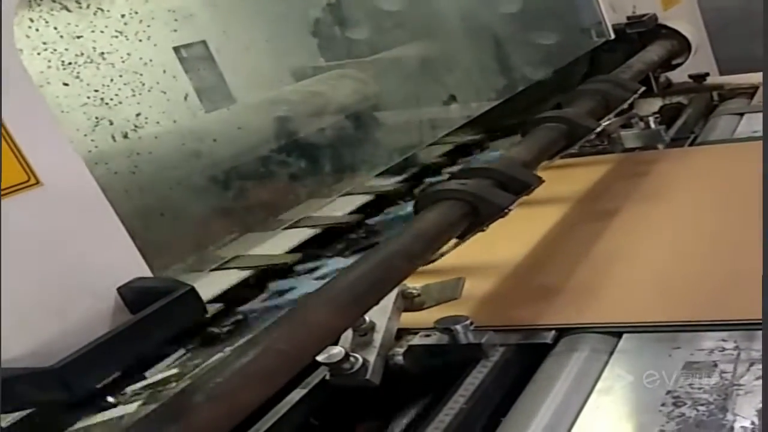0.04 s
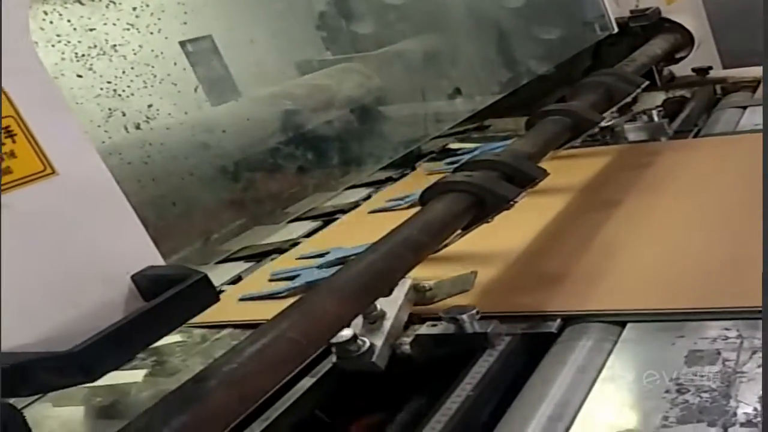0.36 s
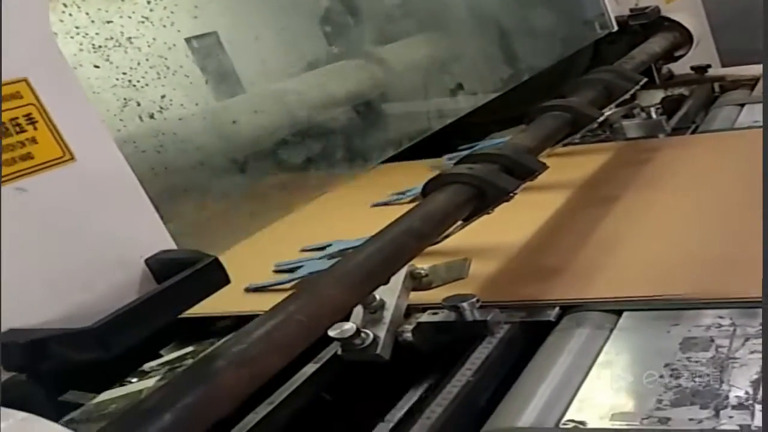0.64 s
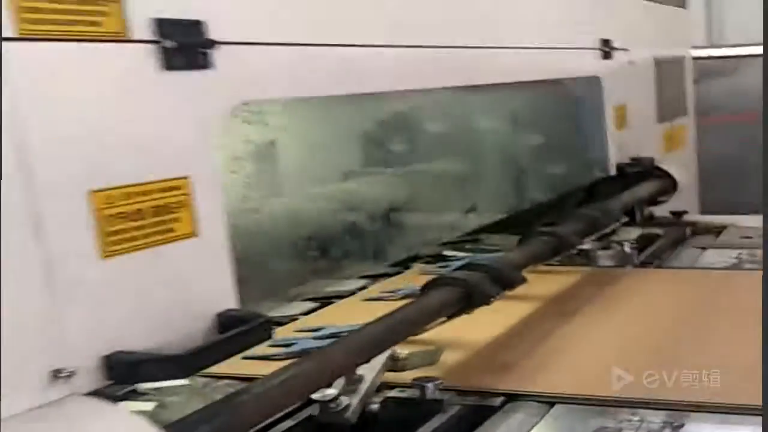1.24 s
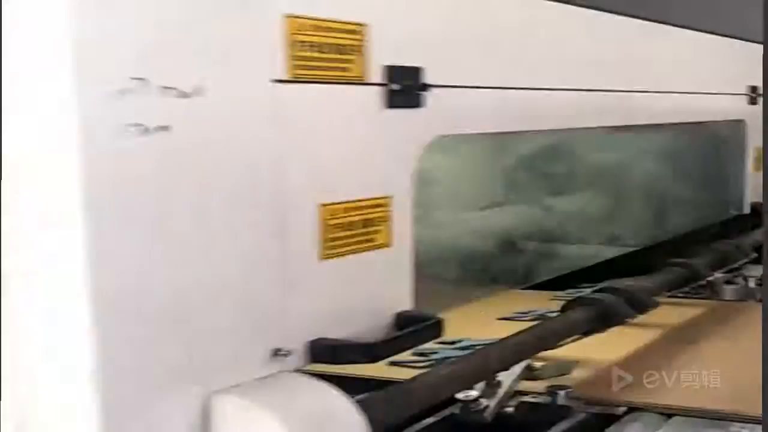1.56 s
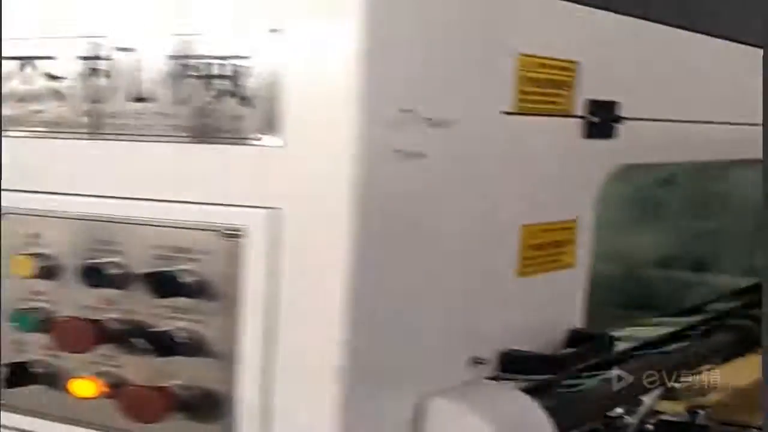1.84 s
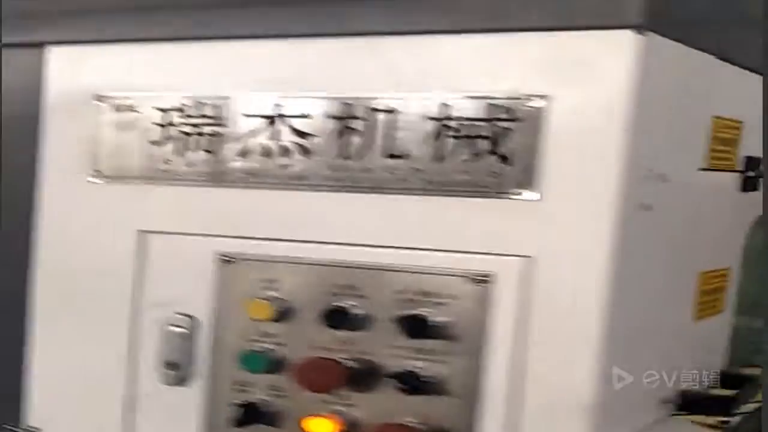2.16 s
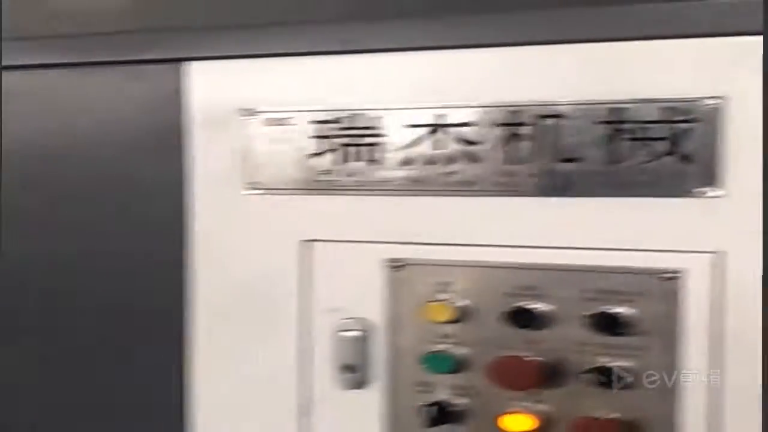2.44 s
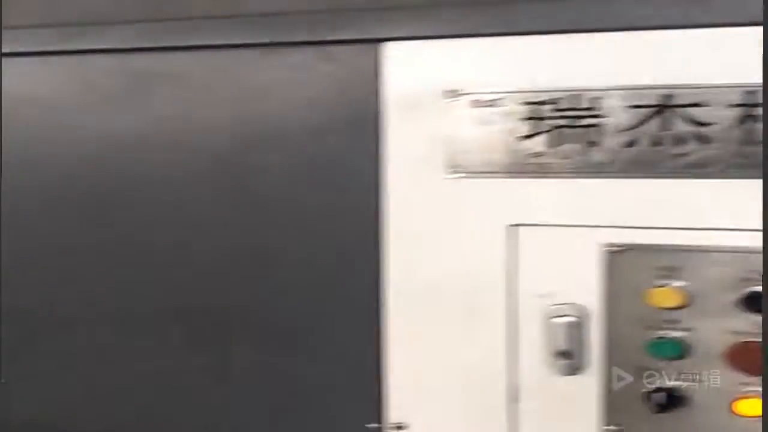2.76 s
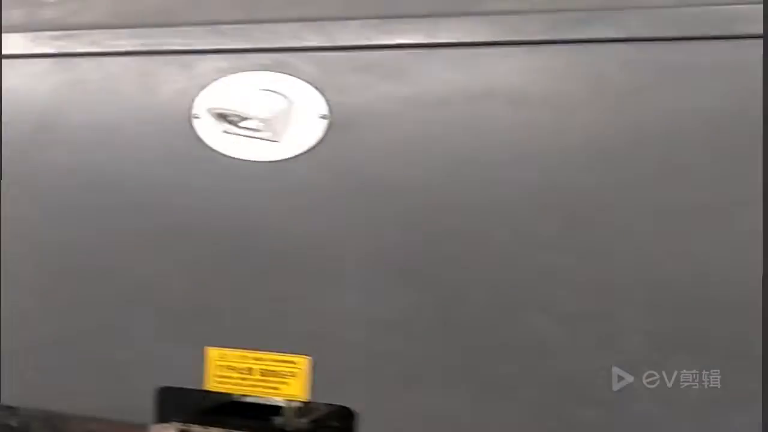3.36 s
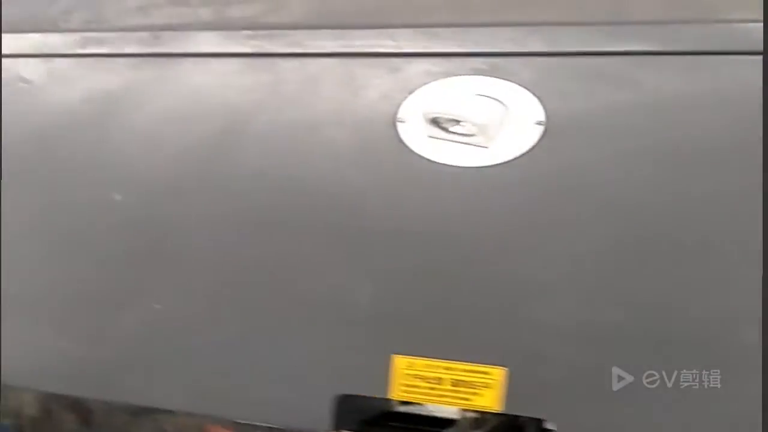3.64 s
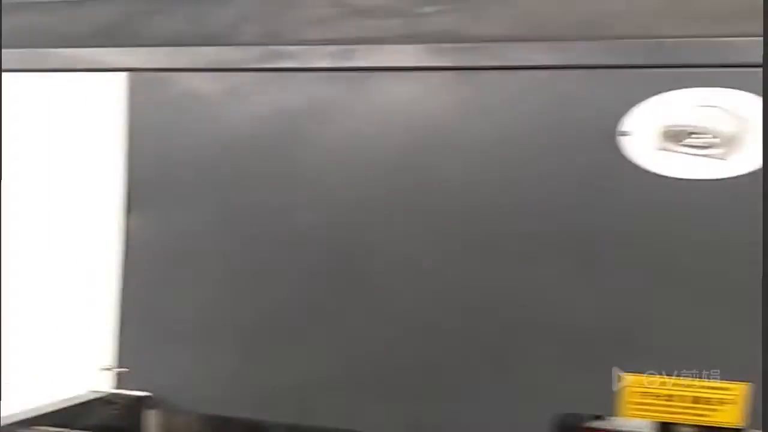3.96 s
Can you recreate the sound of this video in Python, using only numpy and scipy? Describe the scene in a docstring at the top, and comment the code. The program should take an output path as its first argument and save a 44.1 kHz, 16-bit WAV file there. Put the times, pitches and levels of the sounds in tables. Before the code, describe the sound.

In a rumbling factory hall, a nearby carton machine cycles steadily: air rushes, a cardboard sheet scrapes through rollers, knocks and flops down, and the feeder clacks back. The hiss softens as the microphone passes behind a cabinet.

```python
"""A carton machine draws in one cardboard sheet per cycle in a factory hall. Each feed opens with a thump and a
rush of suction air. The sheet rubs through the rollers, knocks on the stops, snaps free and the board flexes
with a thud; the feeder clacks back. Frame and panels ring along. Drives rumble throughout. The listener walks
behind the control cabinet, which shades the treble."""
import sys
import numpy as np
from scipy import signal
from scipy.fft import rfft, irfft
from scipy.io import wavfile

SR = 44100
rng = np.random.default_rng(int(sys.argv[2]) if len(sys.argv) > 2 else 0)


def put_to_file(sound):
    """Save the sound as 16-bit audio at rate SR, in the file named by the first command-line argument."""
    columns = np.atleast_2d(sound).T  # one column per channel
    safe = np.clip(columns, -1, 1)
    whole_steps = np.round(safe * 32767)
    wavfile.write(sys.argv[1], SR, whole_steps.astype(np.int16))


N = 176400
T = np.arange(N) / SR
HZ = np.maximum(np.fft.rfftfreq(N, 1 / SR), 1)

# layer levels per feed: suction_db, rub_db, hiss_db, roller_db, shudder_db, drone_db
FEEDS = [(-1, 1.5, 0, 4, -34, -9), (2.5, 2.5, 10.5, 3, -3, -17), (0, 0, 4.5, -1.5, -2, -5.5),
         (-4, 0, 0, -0.5, -1, -3.5), (-4.5, 0, -9, 1.5, 6.5, 0.5)]
SUCTION_DB, RUB_DB, HISS_DB, ROLLER_DB, SHUDDER_DB, DRONE_DB = np.transpose(FEEDS)
FIRST_FEED_S, CYCLE_S = -.158, .937
# sheet rubbing on rollers and bed: after_start_s, level_db
RUB_SHAPE = [(-.006, -43.5), (.025, -27.5), (.13, -22.5), (.24, -22), (.3, -18.5), (.35, -25.5),
             (.4, -21.5), (.48, -29.5), (.56, -36), (.75, -48.5), (.94, -40.5)]
# rub spectrum: freq_hz, level_db
RUB_COLOUR = [(150, -9), (350, -12), (560, 0), (1000, 2.5), (1500, -2), (1950, 1.5), (2400, -2.5),
              (3100, -3.5), (5500, -3), (7500, -34), (16000, -42)]
# spectrum of snapping board and air: freq_hz, level_db
SNAP_COLOUR = [(400, 2), (1000, 0), (2300, -4.5), (3100, 9.5), (3600, 3.5), (4200, 6.5), (5800, 13),
               (6600, -1.5), (7800, -34), (16000, -25)]
# steel frame and guards: freq_hz, gain_db, t60_s
FRAME_MODES = [(580, -10, 0.64), (797, 8, 0.2), (910, 3, 0.18), (1112, -22, 0.058), (1980, 3, 0.21),
               (2173, 15.5, 0.083), (2880, -1, 0.065), (3000, 1, 0.2), (3330, 3, 0.25), (4445, 5, 0.25),
               (4900, 15, 0.14), (5450, 15, 0.05), (5450, 6, 0.2), (5890, 9, 0.27), (6700, -14, .15)]
# how far the cabinet hides the feeder: time_s, share
SHADE = [(0, 0.2), (1.3, 0.5), (2.2, 0.28), (2.5, 0.44), (2.66, 0.8), (2.95, 0.88), (3.3, 0.59), (3.6, 1),
         (4, 0.88)]
HIDDEN = np.interp(T, *np.transpose(SHADE))
# left-right likeness: freq_hz, correlation
LIKENESS = [(30, 1), (125, 0.97), (250, 0.93), (500, 0.73), (1000, 0.41), (2000, 0.064), (5000, 0.004),
            (15000, 0.059)]


def from_db(db):
    """Decibels to gain."""
    return 10 ** (np.asarray(db) / 20)


def rms_one(x):
    """Scale to unit power."""
    return x / np.sqrt(np.mean(x ** 2) + 1e-20)


def at_hz(points):
    """Interpolate a spectrum on a log-frequency axis."""
    hz, value = np.transpose(points)
    return np.interp(np.log(HZ), np.log(hz), value)


def drift(corner_hz):
    """Low-passed random wander, unit power."""
    return rms_one(irfft(rfft(rng.standard_normal(N)) / (1 + (HZ / corner_hz) ** 2), N))


def noise(colour):
    """Coloured stereo noise, alike in the bass, diffuse in the treble."""
    mid, side = rfft(rng.standard_normal((2, N)))
    alike = np.clip(at_hz(LIKENESS), -1, 1)
    stereo = np.sqrt(1 + alike) * mid + np.sqrt(1 - alike) * side * [[1], [-1]]
    rolloff = np.minimum(1, np.minimum(colour[-1][0] / HZ, HZ / colour[0][0])) ** 3
    return rms_one(irfft(from_db(at_hz(colour)) * rolloff * stereo, N))


def shade(full_db):
    """Gain of a source as the cabinet comes between."""
    return from_db(full_db * HIDDEN)


def cycled(shape, levels_db):
    """Repeat one envelope at every feed."""
    after_s, db = np.transpose(shape)
    out = 0
    for feed, level_db in enumerate(levels_db):
        age = T - (FIRST_FEED_S + CYCLE_S * feed)
        active = (age > after_s[0]) * (age < after_s[-1])
        out = out + from_db(level_db + np.interp(age, after_s, db)) * active
    return out


def blow(start_s, rise_s, t60_s, tail_db=-17.5, tail_t60_s=.82):
    """Envelope: quick rise, decay, quieter hall tail."""
    age = np.maximum(T - start_s - rise_s, 0)
    decay = np.hypot(from_db(-60 * age / t60_s), from_db(tail_db - 60 * age / tail_t60_s))
    return np.clip((T - start_s) / rise_s, 0, 1) * decay


def swell(age, peak_s):
    """Envelope of a soft push, peak 1."""
    return (age / peak_s * np.exp(1 - age / peak_s)) ** 2


def ring(x, modes):
    """Damped modes, scaled to the power of their drive."""
    out = 0
    for hz, db, t60_s in modes:
        r, w = from_db(-60 / (t60_s * SR)), 2 * np.pi * hz / SR
        out = out + signal.lfilter([0, from_db(db) * np.sin(w)], [1, -2 * r * np.cos(w), r * r], x + 1e-18)
    return rms_one(out) * np.std(x)


def reverb(x, wet_db=-8, t60_s=.24, gap_s=.012):
    """Dense stereo tail of the hall, wet only."""
    t = T[:SR]
    tail = rng.standard_normal((3, SR)) * from_db(-60 * t / t60_s) * (t > gap_s)
    tail = tail[:2] * 0.3 + tail[2]
    tail /= np.sqrt(np.sum(tail[0] ** 2))
    return from_db(wet_db) * signal.fftconvolve(x.mean(axis=0)[None], tail, axes=1)[:, :N]


def panel_echoes(x, count=4, echo_db=-9, longest_s=.022):
    """Echoes off nearby steel panels ripple the treble, differently at each ear."""
    lags_s = longest_s * rng.uniform(.1, 1, (count, 2, 1))
    echoes = sum(np.exp(-2j * np.pi * HZ * lag) for lag in lags_s) / np.sqrt(count)
    gain = from_db(echo_db) * (1 - np.clip(at_hz(LIKENESS), 0, 1))
    return irfft(rfft(x) * (1 + gain * echoes) / np.sqrt(1 + gain ** 2), N)


def hall(rumble_db=-31.5, waver_db=2, throb_db=.5):
    """Hall rumble and drive tones that waver in level."""
    # drive tones: pitch_hz, level_db
    tones = [(37.7, -51), (113, -46), (300, -64)]
    # rumble spectrum: freq_hz, level_db
    colour = [(20, -29), (38, 2.5), (70, -2), (120, -5.5), (170, -1.5), (260, -1), (400, -11), (500, -12.5),
              (620, -11), (980, -18.5), (1250, -36), (3000, -17), (5500, -30), (7500, -32), (14000, -29),
              (16000, -63)]
    hum = 0
    for hz, db in tones:
        amplitude = np.sqrt(2) * from_db(db + waver_db * drift(7.9))
        hum = hum + amplitude * np.sin(2 * np.pi * (hz * T + rng.random()))
    return hum + noise(colour) * from_db(rumble_db + throb_db * drift(17)) * shade(-8.5)


def rollers():
    """Loaded rollers rumble with each feed."""
    # envelope: after_start_s, level_db
    shape = [(-.01, -46), (.03, -28.5), (.1, -26.5), (.2, -34.5), (.31, -35.5), (.4, -26), (.48, -28.5),
             (.58, -42), (.8, -41)]
    # spectrum: freq_hz, level_db
    colour = [(20, 15.5), (36, -11), (60, 3.5), (90, 5.5), (130, 6), (200, 4.5), (310, 2), (430, 0.5),
              (800, -7), (3000, -59)]
    return noise(colour) * cycled(shape, ROLLER_DB)


def shudder():
    """The frame shudders after each feed."""
    # envelope: after_start_s, level_db
    shape = [(-.01, -54), (.03, -36), (.15, -39), (.28, -41), (.5, -61)]
    # spectrum: freq_hz, level_db
    colour = [(15, -32), (28, 6), (37, 10), (50, 12), (70, 15), (120, -46)]
    return noise(colour) * cycled(shape, SHUDDER_DB)


def cabinet_drone():
    """Cabinet panels, heard from close by, drone with the sheet."""
    # panels: freq_hz, gain_db, t60_s
    modes = [(229, -4, 0.12), (319.3, 9, 0.21), (373, -7, 0.26), (558, -12.5, 0.066), (1005, -10.5, 0.042),
             (1244, -9, 0.054), (1533, -7, 0.074), (1750, -11, 0.045)]
    drive = noise(RUB_COLOUR) * cycled(RUB_SHAPE, RUB_DB + DRONE_DB) * HIDDEN
    return ring(drive, modes) * shade(-5)


def thumps(body_db=-10, skirt_db=-7):
    """Low pushes of the feeder: brief tones with rumble around their pitch."""
    # start_s, level_db, pitch_hz, peak_s
    pushes = [(0.277, -19.5, 119.5, 0.024), (0.779, -16, 50.5, 0.012), (.785, -19, 208, 0.0093),
              (.822, -16.5, 167, 0.013), (.855, -20, 72, 0.013), (1.204, -18, 122, 0.0051),
              (1.708, -19, 50, 0.017), (1.715, -21.5, 150, 0.01), (1.744, -21, 203, 0.013),
              (2.486, -25.5, 78, 0.015), (2.656, -22, 67.4, 0.0093), (2.709, -14.5, 143, 0.0053),
              (2.867, -19, 214, 0.011), (3.024, -16.5, 150, 0.0122), (3.055, -19, 200, 0.0071),
              (3.414, -19, 77, 0.016), (3.467, -23, 65, 0.012), (3.519, -20, 58, 0.013),
              (3.591, -20, 49.3, 0.007), (3.647, -27, 180, 0.01), (3.755, -20.5, 215, 0.013)]
    out = 0
    for start_s, db, hz, peak_s in pushes:
        age = np.maximum(T - start_s, 0)
        body = from_db(body_db) * noise([(hz / 2, skirt_db), (hz, 0), (hz * 2, skirt_db)])
        out = out + from_db(db) * swell(age, peak_s) * (np.sin(2 * np.pi * hz * age) + body)
    return out + reverb(out)


def clacks(rise_s=.0052, strike_t60_s=.045, linkage_db=-9.5):
    """Return stroke: a dull clack; the linkage rings when it lands hard."""
    # start_s, level_db, t60_s, hardness_db
    strokes = [(.615, -20.5, 0.37, 6.5), (1.526, -34, 0.45, -12), (1.559, -24, 0.17, -9),
               (2.483, -22.5, 0.48, 12), (3.412, -31, 0.58, -15)]
    # clack spectrum: freq_hz, level_db
    colour = [(150, -0.5), (330, 2.5), (480, 2), (700, -5.5), (950, 3), (1130, -6.5), (1350, -10.5),
              (3000, -16.5)]
    # linkage: freq_hz, gain_db, t60_s
    modes = [(973, 5, 0.1), (1130, 15, 0.08), (1855, 8, 0.22), (1970, 5, 0.16), (2900, -6, 0.12),
             (3070, -7, 0.13)]
    power, strike = 0, 0
    for start_s, db, t60_s, hardness_db in strokes:
        age = np.maximum(T - start_s, 0)
        power += (from_db(db) * blow(start_s, rise_s, t60_s, tail_db=-17, tail_t60_s=.4)) ** 2
        strike += from_db(db + hardness_db - 60 * age / strike_t60_s) * (T > start_s)
    linkage = rms_one(ring(strike * rng.standard_normal((2, N)), modes)) * np.sqrt(power.mean())
    return np.sqrt(power) * noise(colour) + from_db(linkage_db) * linkage


def flexes(body_db=-9, glide_hz_per_s=550, swish_t60_s=.59):
    """The board flexes: a hollow thud rising in pitch, a swish as it scrapes."""
    # start_s, level_db, pitch_hz, peak_s, swish_db
    bends = [(0.458, -18, 204, 0.0074, -3.5), (0.483, -16.5, 242.6, 0.013, -8.5),
             (1.391, -20.5, 203, 0.0076, -10), (1.42, -26.5, 249, 0.015, -18),
             (2.331, -17.5, 241, .008, -19), (3.266, -15, 219, 0.0082, -25),
             (3.291, -39, 239, .007, -25)]
    # thud spectrum: freq_hz, level_db
    colour = [(110, 2), (170, -4), (290, 2.5), (350, -20), (600, -19), (1200, -59)]
    body = from_db(body_db) * noise(colour)
    thud, swish = 0, 0
    for start_s, db, hz, peak_s, swish_db in bends:
        age = np.maximum(T - start_s, 0)
        tone = np.sin(2 * np.pi * (hz + glide_hz_per_s * age / 2) * age)
        thud = thud + from_db(db) * swell(age, peak_s) * (tone + body)
        swish = np.hypot(swish, from_db(db + swish_db) * blow(start_s, peak_s, swish_t60_s))
    return thud + reverb(thud) + swish * noise(SNAP_COLOUR)


def contacts(events, rise_s):
    """Envelope of the sheet's contacts, summed in power."""
    return np.sqrt(sum((from_db(db) * blow(start_s, rise_s, t60_s, tail_db=-6.5, tail_t60_s=.36)) ** 2
                       for start_s, db, t60_s in events))


def knocks(frame_db=-11.5):
    """The sheet knocks on the stops and sets the frame ringing."""
    # start_s, level_db, t60_s
    hits = [(0.241, -16, 0.27), (1.152, -19, 0.091), (1.175, -13, 0.13), (2.11, -19, 0.16),
            (2.185, -19.5, 0.16), (3.043, -23, 0.051), (3.985, -30, .15)]
    # spectrum: freq_hz, level_db
    colour = [(100, -24), (300, -3), (460, -5.5), (565, 9), (690, -0.5), (785, 10.5), (845, 9), (912, 10),
              (1010, -5), (1110, 6), (1300, -7), (2000, -29), (6000, -38)]
    knock = contacts(hits, rise_s=.011) * noise(colour)
    return knock + from_db(frame_db) * ring(knock, FRAME_MODES)


def snaps(rise_s=.0079):
    """Sharp cracks of board and air, each with its own share of sizzle."""
    # start_s, level_db, treble_db, t60_s
    cracks = [(.117, -28, 5, 0.055), (0.131, -15, 2, 0.043), (0.147, -15.5, -1, 0.43),
              (0.302, -12.5, -15, 0.17), (0.702, -22.5, -12, 0.13), (1.065, -17, 1, 0.48),
              (1.238, -8, -21, 0.096), (1.635, -34, -9, 0.11), (2.134, -14.5, 2, 0.21),
              (2.173, -11, -10, 0.19), (2.194, -13.5, 3.5, 0.13), (2.48, -13, -16, 0.036),
              (2.839, -19.5, -38, 0.07)]
    # sizzle spectrum: freq_hz, level_db
    sizzle_colour = [(2500, -41), (5000, -26), (6000, 7.5), (7500, 3), (9500, 1), (13000, 3.5), (15000, 0),
                     (16000, -24)]
    body, sizzle = 0, 0
    for start_s, db, treble_db, t60_s in cracks:
        envelope = from_db(db) * blow(start_s, rise_s, t60_s)
        body = np.hypot(body, envelope)
        sizzle = np.hypot(sizzle, envelope * from_db(treble_db))
    return body * noise(SNAP_COLOUR) + sizzle * noise(sizzle_colour)


def catches(grain_db=3, grain_hz=350):
    """The board catches in the rollers with short grainy rasps."""
    # start_s, level_db, t60_s
    rasps = [(0.131, -17, .12), (0.223, -17.5, 0.098), (.615, -25.5, .09), (.797, -23.5, .14),
             (1.16, -32, .06), (1.716, -21, 0.17), (1.845, -24, .05), (2.114, -27, .05),
             (2.912, -32, 0.017), (2.942, -22, 0.18), (3.05, -24.5, .07), (3.87, -21, .1)]
    # spectrum: freq_hz, level_db
    colour = [(500, -9), (1000, 8.5), (1520, 4), (1900, 3), (2400, 3), (2900, -6), (3600, 0), (6000, -10),
              (8000, -18), (15000, -32)]
    return contacts(rasps, rise_s=.0045) * rms_one(noise(colour) * from_db(grain_db * drift(grain_hz)))


def crackle(colour, per_s, spread_db):
    """Tiny slips of the board's fibres, random in time and size."""
    sizes = from_db(spread_db * np.minimum(rng.exponential(1, (2, N)), 4))
    signs = rng.choice([-1, 1], (2, N))
    slips = sizes * signs * (rng.random((2, N)) < per_s / SR)
    return rms_one(irfft(rfft(slips) * from_db(at_hz(colour)), N))


def slaps(per_s=70, spread_db=1.5):
    """The sliding sheet slaps the bed and rings, differently at each ear."""
    # board: freq_hz, level_db, t60_s
    modes = [(660, 2.5, 0.031), (910, 0, 0.027), (1372, -0.5, 0.033), (1909, 0.5, 0.02), (2288, 1.5, 0.035),
             (2850, 3.5, 0.016), (4420, 4, .012)]
    sizes = from_db(spread_db * np.minimum(rng.exponential(1, N), 2.5))
    hits = sizes * (rng.random(N) < per_s / SR)
    out = 0
    for hz, db, t60_s in modes:
        drive = hits * (rng.standard_normal((2, N)) + rng.standard_normal(N))
        out = out + from_db(db) * rms_one(ring(drive, [(hz, 0, t60_s)]))
    return rms_one(out)


def sheet_echo(x, first_delay_s=.0046, slope_s_per_s=-.001967, echo_db=-9):
    """The advancing sheet reflects its own rubbing; ripples glide through the spectrum."""
    delay_s = first_delay_s + slope_s_per_s * ((T - FIRST_FEED_S) % CYCLE_S)
    echo = np.array([np.interp(T - delay_s, T, ear) for ear in x])
    gain = from_db(echo_db)
    return (x + gain * echo) / np.hypot(1, gain)


def sheet_hiss(grit_db=-7):
    """Bright hiss and ticking fibres as the sheet gathers speed."""
    # envelope: after_start_s, level_db
    shape = [(0, -39), (.06, -42.5), (.135, -15), (.21, -14.5), (.25, -19.5), (.31, -14), (.37, -22.5),
             (.44, -31), (.52, -34), (.62, -27), (.8, -44.5), (.937, -43)]
    # spectrum: freq_hz, level_db
    colour = [(2000, -42), (5000, -1), (6800, 3), (8000, -4.5), (9500, -5), (11000, -3.5), (13000, 0),
              (15000, 0), (16000, -31)]
    grit = from_db(grit_db) * crackle(colour, per_s=1200, spread_db=1.5)
    return rms_one(noise(colour) + grit) * cycled(shape, HISS_DB) * shade(-36)


def sheet_rub(scrape_db=3.5, fibre_db=-27, slap_db=-4.5):
    """The sheet rubs, scrapes and slaps over rollers and bed."""
    # sharp edge of the rub: freq_hz, level_db
    scrape_colour = [(900, -3.5), (1400, -24), (2000, -4), (2400, 3.5), (2800, 5.5), (3300, 2), (3800, -7),
                     (5500, -25), (7500, -27)]
    scrape = from_db(scrape_db) * noise(scrape_colour)
    fibres = from_db(fibre_db) * crackle(SNAP_COLOUR, per_s=900, spread_db=3)
    clatter = from_db(slap_db) * slaps()
    friction = noise(RUB_COLOUR) * shade(-5) + (scrape + fibres) * shade(-25.5) + clatter * shade(-11.5)
    return sheet_echo(friction) * cycled(RUB_SHAPE, RUB_DB)


def suction(rise_s=.0034):
    """Air spits as the valve opens, then rushes through the cycle."""
    # rush envelope: after_start_s, level_db
    shape = [(-.004, -72), (.003, -25), (.02, -20.5), (.04, -13.5), (.09, -17.5), (.145, -12), (.195, -10),
             (.245, -15.5), (.31, -7.5), (.35, -17.5), (.385, -13.5), (.44, -25), (.56, -25), (.66, -25),
             (.79, -35.5), (.94, -38.5)]
    # air spectrum: freq_hz, level_db
    colour = [(1500, -6.5), (2400, -12), (2900, -11), (3250, -14), (3700, -8), (4250, 0), (5300, 3),
              (5900, 5), (6450, -5.5), (7200, -27.5), (9000, -55), (16000, -31)]
    # start_s, level_db, t60_s
    spits = [(0.782, -21, 0.074), (.812, -28, 0.17), (1.712, -13, 0.094), (1.753, -33, 0.18),
             (2.653, -11.5, 0.091), (2.68, -11, 0.32), (2.765, -21.5, 0.25), (3.588, -16.5, 0.29),
             (3.612, -10.5, 0.5)]
    valve = sum(from_db(db) * blow(start_s, rise_s, t60_s) for start_s, db, t60_s in spits)
    return noise(colour) * np.hypot(cycled(shape, SUCTION_DB), valve) * shade(-13)


def feeder(flutter_db=1.23, flutter_hz=28, grain_db=1.05, grain_hz=810, frame_db=-17.5):
    """Air, rub and hiss flutter with the board; rollers, frame and cabinet sound along."""
    flutter = from_db(flutter_db * drift(flutter_hz) + grain_db * drift(grain_hz))
    air, rub, hiss = suction(), sheet_rub(), sheet_hiss()
    rumble = rollers() + shudder() + cabinet_drone()
    frame = from_db(frame_db) * ring(air + rub, FRAME_MODES)
    return panel_echoes(flutter * (air + rub + hiss)) + frame + rumble


def scene():
    """The machine in its hall."""
    return feeder() + catches() + snaps() + knocks() + clacks() + thumps() + flexes() + hall()


def record(dry, taps=255, cutoff_hz=15700):
    """Colour left and right differently, clip the peaks, cut the top."""
    # microphone balance: freq_hz, left_minus_right_db
    balance = [(60, 1.5), (87, 0.5), (130, -2), (180, 0), (260, 1.5), (380, 0.5), (550, 1.5), (790, 0.5),
               (1140, -0.5), (1650, -0.5), (2380, -1), (3440, -5.5), (4970, -1.5), (7180, 7), (10400, -6),
               (15000, -3)]
    gains = from_db(at_hz(balance) * [[.5], [-.5]])
    response = np.roll(irfft(gains, N), taps // 2, axis=1)[:, :taps]
    coloured = signal.fftconvolve(dry, response, mode="same", axes=1)
    lowpass = signal.ellip(10, .1, 70, cutoff_hz, fs=SR, output="sos")
    return signal.sosfilt(lowpass, np.clip(coloured, -1, 1))


dry = scene()
out = record(dry)
put_to_file(out)
```